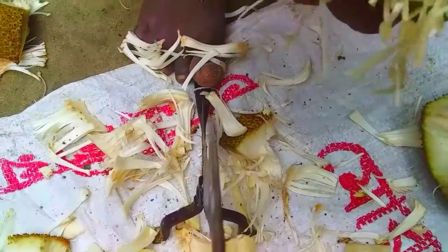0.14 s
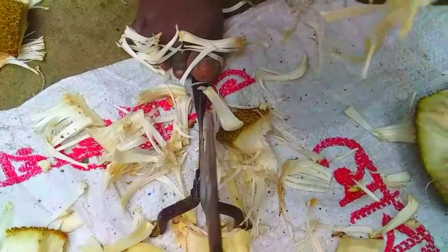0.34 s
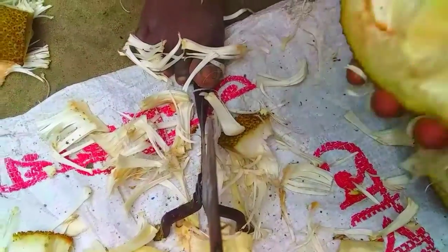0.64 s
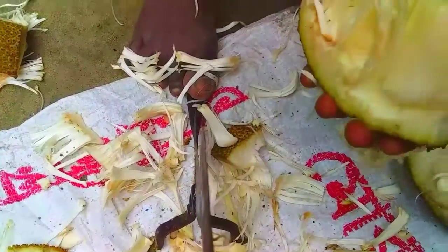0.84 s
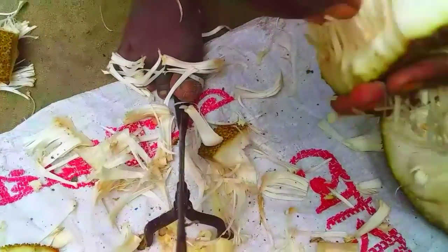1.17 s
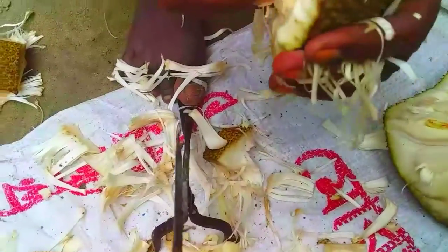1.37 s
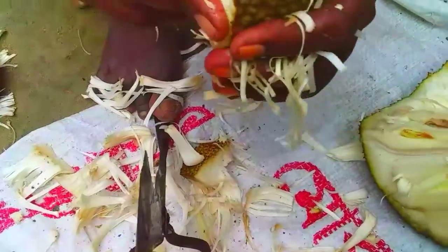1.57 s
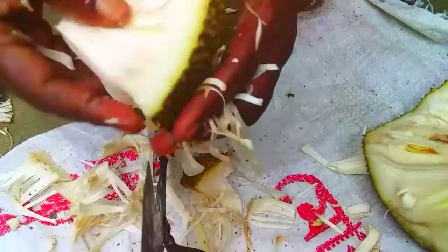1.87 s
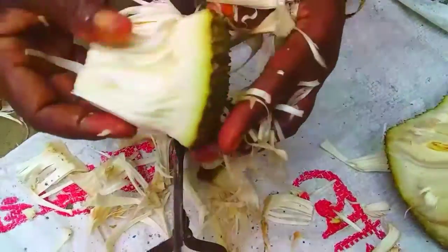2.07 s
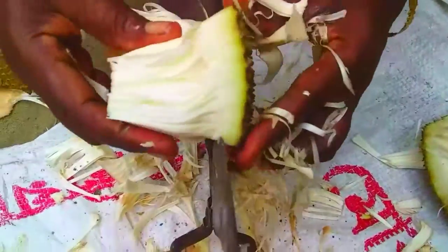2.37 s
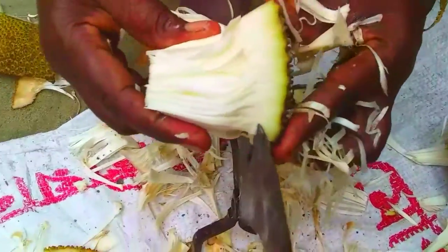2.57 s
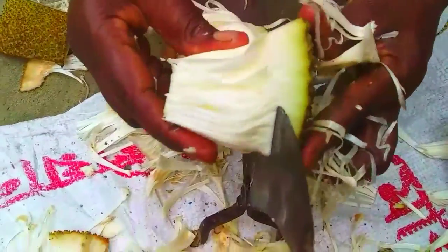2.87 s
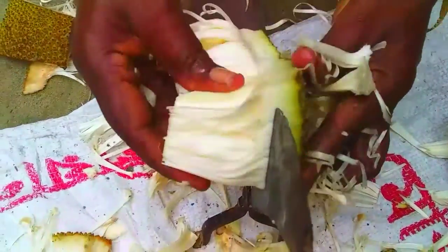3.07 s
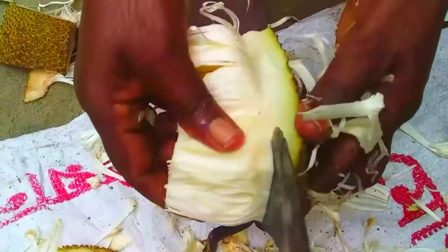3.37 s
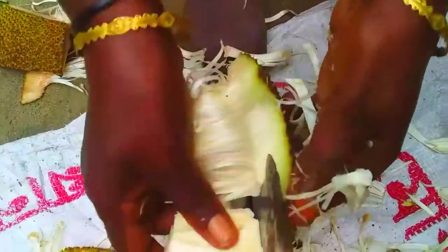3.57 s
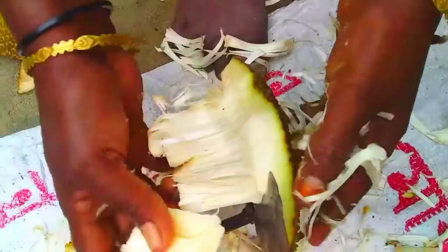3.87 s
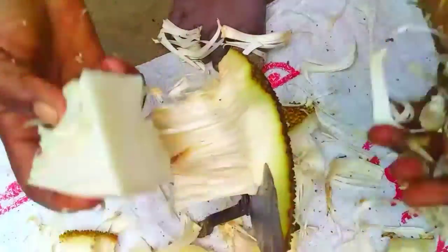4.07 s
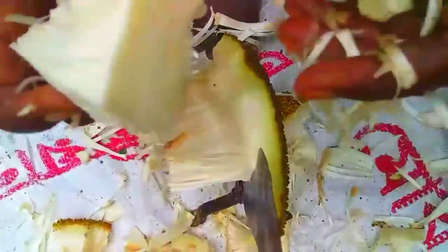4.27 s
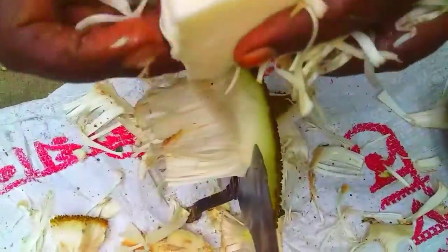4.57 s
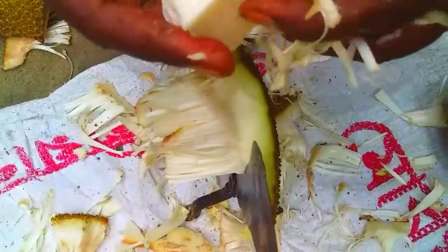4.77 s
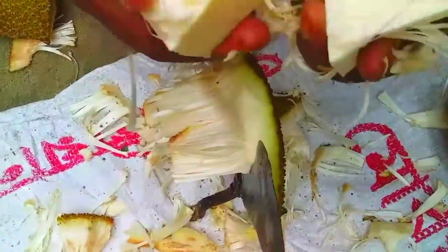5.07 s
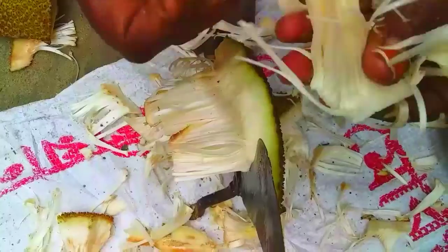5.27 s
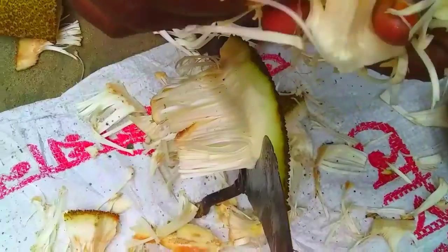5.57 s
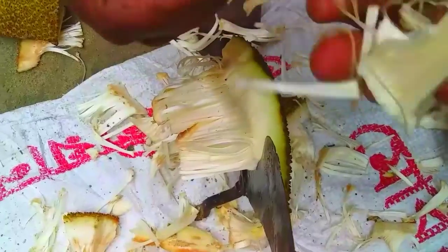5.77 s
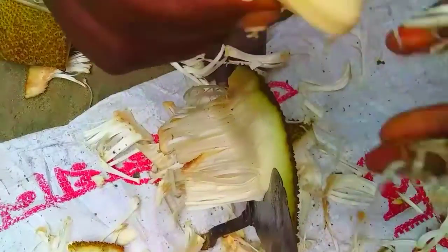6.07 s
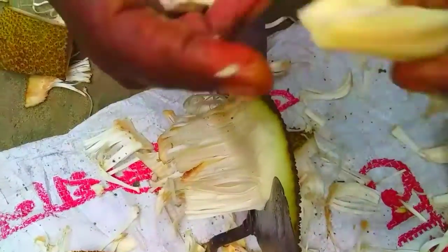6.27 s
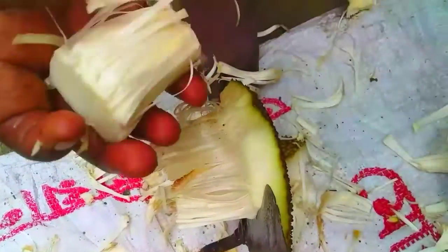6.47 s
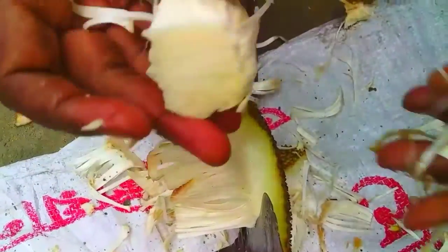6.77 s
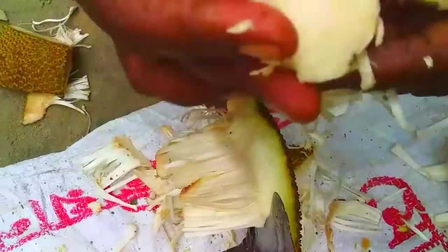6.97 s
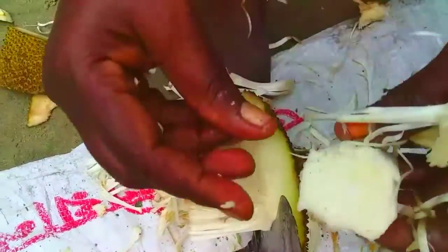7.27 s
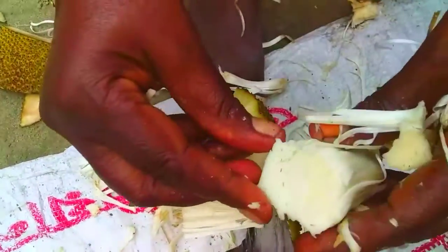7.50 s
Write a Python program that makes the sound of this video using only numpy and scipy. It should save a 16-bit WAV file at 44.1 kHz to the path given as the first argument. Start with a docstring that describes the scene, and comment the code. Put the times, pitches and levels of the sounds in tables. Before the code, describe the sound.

Wet fruit fibres crackle and snap on a blade, plastic sacking rustles, chicks peep steadily, a kid goat bleats, and fainter goats answer.

```python
"""A village yard: right under the microphone a green jackfruit is cut on an upright blade, noise grains for
the fibres, damped rings for the bumps; a bird swoops first, then chicks peep as gliding whistles between walls.
A young goat bleats once close by, harmonics through a throat; hands brush a plastic sack in sparse bright ticks.
Far goats answer, one rising and one trembling, and falling chips follow. Filtered noise gives a low rumble and
hiss throughout; a second low noise swells towards the end, as of a distant engine."""
import sys
import numpy as np
from scipy import signal
from scipy.fft import rfft, irfft, next_fast_len
from scipy.io import wavfile

SR = 44100
rng = np.random.default_rng(int(sys.argv[2]) if len(sys.argv) > 2 else 0)


def master(y):
    """Save y as 16-bit WAV."""
    cut = np.clip(np.atleast_2d(y).T, -1, 1)
    pcm = np.round(cut * 32767)  # scale
    wavfile.write(sys.argv[1], SR, pcm.astype(np.int16))


N = 336867
TIME = np.arange(N) / SR

# bright colour of breaking fibres and of the rubbed weave: frequency_hz, density_db (per Hz)
CRISP = [(500, -12), (1200, -21), (1800, -34), (3000, -8), (4200, 2), (5400, -3), (7000, 4.5), (8500, 3.5),
         (10500, -1), (12800, 4), (15500, -21.5)]


def from_db(db):
    """Decibels to amplitude gain."""
    return 10 ** (np.asarray(db) / 20)


def rms_one(x):
    """Scale to unit power."""
    return x / np.sqrt(np.mean(x ** 2) + 1e-20)


def in_time(rows, t=TIME):
    """Each column after the first, read along the first at the points t."""
    s, *columns = np.transpose(rows)
    return [np.interp(t, s, column) for column in columns]


def gain_at(spectrum, hz):
    """Gain of a spectrum, straight lines in dB over log frequency."""
    points, db = np.transpose(spectrum)
    return from_db(np.interp(np.log(hz + 1e-6), np.log(points), db))


def coloured(x, spectrum):
    """Causal (minimum-phase) filter with that spectrum and unit power gain."""
    size = 2 * next_fast_len(N // 2 + 4096)
    gain = rms_one(gain_at(spectrum, np.fft.rfftfreq(size, 1 / SR)))
    # folding the cepstrum forward in time gives the minimum phase
    cepstrum = irfft(np.log(gain))
    cepstrum[1:size // 2] *= 2
    cepstrum[size // 2 + 1:] = 0
    return irfft(rfft(x, size) * np.exp(rfft(cepstrum)))[:N]


def drift(rate, size):
    """Random values of spread 1, rate of them a second, joined by straight lines."""
    steps = np.arange(size) * rate / SR
    return np.interp(steps, np.arange(20000), rng.standard_normal(20000))


def add(out, s, sound):
    """Mix a sound in at time s."""
    start = round(s * SR)
    out[start:start + len(sound)] += sound[:max(N - start, 0)]


def yard(x, gap_s=0.0083, wall_s=0.032, wall=0.44, dull_hz=6500):
    """Scattered, dulled echoes die away, and one wall stands out among them."""
    t60_s = 0.49
    t = TIME[:SR]
    tail = rng.standard_normal(SR) * from_db(-60 * t / t60_s) * np.clip(t / gap_s - .5, 0, 1)
    tail = signal.sosfilt(signal.butter(1, min(dull_hz, SR / 3), fs=SR, output="sos"), tail)
    tail /= np.linalg.norm(tail)
    tail[int(wall_s * SR)] += wall
    return signal.fftconvolve(x, tail)[:N]


def grains(per_s, spread_db):
    """Random tiny fractures of uneven size; unit power."""
    sizes = from_db(spread_db * np.minimum(rng.exponential(1, N), 4))
    signed = sizes * rng.choice([-1, 1], N)
    return rms_one(signed * (rng.random(N) < per_s / SR))


def cutting(release_s=0.0065, snap_s=0.0014, flesh_db=-4):
    """Fibres break in swarms under each stroke and singly between; the moist flesh adds a dull knock."""
    # strokes that tear the fibres: start_s, length_s, level_db, dullness_db (dull part against crisp, before flesh_db)
    strokes = [(0.179, 0.048, -56, 2), (1.047, 0.02, -48.5, -0.5), (2.7, 0.11, -55, -1.5),
               (2.93, 0.072, -46, -4), (3.213, 0.065, -43, -4), (3.529, 0.055, -42.5, 3),
               (3.557, 0.075, -35, -4), (3.592, 0.0075, -35, 1), (4.739, 0.0045, -30, -8),
               (4.798, 0.026, -38, -11), (4.873, 0.032, -44.5, -2), (5.564, 0.063, -48, -12),
               (6.052, 0.041, -48.5, 4.5), (6.096, 0.16, -63.5, 13.5), (6.596, 0.026, -50.5, 2.5),
               (7.142, 0.046, -66, 16.5), (7.482, 0.13, -49, -3)]
    # loudest single fibres: start_s, level_db (noise before colouring), dullness_db (as above)
    snaps = [(0.1032, -44.5, 1), (0.1245, -40, 2), (0.2168, -35.5, 2), (0.392, -51, 11),
             (1.076, -40.5, 8.5), (3.5354, -37, 0), (3.5687, -32, 8.5), (3.5957, -32.5, 9.5),
             (3.6058, -23, -12), (3.8427, -49, 7), (4.4722, -37, 0.5), (4.667, -36.5, -20),
             (4.809, -29, -2), (4.8846, -34, -3), (4.93, -29.5, -5), (5.0211, -27.5, -15),
             (5.243, -44, 0.5), (5.27, -37.5, -14), (5.5883, -35, -22), (7.0061, -39, -29), (7.097, -47, 9)]
    # dull colour of the moist flesh: frequency_hz, density_db (per Hz)
    flesh = [(50, -12), (150, 11), (400, -2), (700, 1.5), (1000, 3.5), (1600, 10.5), (2300, 7.5),
             (4000, 4.5), (9000, -27)]

    crisp, dull = np.zeros((2, N))
    for s, length, level_db, dull_db in strokes:
        t = TIME[:int((2 * length + 8 * release_s) * SR)]
        onset = np.minimum(t / (0.18 * length), 1)
        release = np.exp(-np.maximum(t - 0.81 * length, 0) / (release_s + 0.11 * length))
        push = from_db(level_db) * onset * release
        add(crisp, s, push)
        add(dull, s, push * from_db(dull_db))
    # bundles of fibres give way unevenly
    catching = rms_one(from_db(2.4 * drift(220, N)))
    crisp = catching * crisp * grains(3700, 1.8)
    dull = catching * dull * grains(2000, 1.9)

    t = TIME[:SR // 50]
    for s, level_db, dull_db in snaps:
        bursts = from_db(level_db) * np.exp(-t / snap_s) * rng.standard_normal((2, len(t)))
        add(crisp, s, bursts[0])
        add(dull, s, bursts[1] * from_db(dull_db))
    return coloured(crisp, CRISP) + from_db(flesh_db) * coloured(dull, flesh)


def bumps():
    """Soft bumps of the fruit and the blade: heavily damped rings that build over one cycle."""
    # start_s, level_db (amplitude before the decay), pitch_hz, t60_s
    knocks = [(0.852, -26, 101, 0.032), (1.051, -38.5, 730, 0.027), (3.533, -21.5, 145, 0.02),
              (3.594, -26.5, 672, 0.024), (5.325, -48, 654, 0.034), (6.598, -58, 644, .04),
              (7.155, -44, 670, 0.02)]
    out, t = np.zeros(N), TIME[:SR // 4]
    for s, level_db, hz, t60 in knocks:
        envelope = from_db(level_db - 60 * t / t60) * np.minimum(t * hz, 1)
        add(out, s, envelope * np.sin(2 * np.pi * hz * t))
    return out


def sack(per_s=170, spread_db=2.5, rub_db=-1):
    """Each brush rubs the weave and sets off sparse bright ticks of plastic strands; a few tick on at rest."""
    # the hands brush the woven sack: start_s, length_s, level_db
    rustles = [(2.43, 0.52, -69), (3.673, 0.19, -60.5), (4.013, 0.19, -60), (4.633, 0.31, -56),
               (5.2, 0.3, -64.5), (5.804, 0.14, -54.5), (6.633, 0.22, -60)]
    # colour of the plastic strands: frequency_hz, density_db (per Hz)
    plastic = [(1000, -10.5), (3000, -7), (5500, -13), (7500, 1), (10000, -5), (12500, -3), (15500, 2.5)]
    attack_s, release_s, rest_db = 0.025, 0.027, -64

    brush = np.zeros(N)
    for s, length, level_db in rustles:
        attack = np.clip((TIME - s) / attack_s, 0, 1)
        release = np.exp(-np.maximum(TIME - s - length, 0) / release_s)
        brush += from_db(level_db) * attack * release
    ticks = (from_db(rest_db) + brush) * coloured(grains(per_s, spread_db), plastic)
    rub = from_db(rub_db) * brush * coloured(grains(2500, 1.1), CRISP)
    return ticks + rub


def goat(curve, throat, jitter=.025, flutter_db=2.0, rasp=.7, pivot_hz=1600):
    """Harmonics of the vocal folds through the throat; roughness shakes the period and the pulse strength."""
    t = np.arange(curve[0][0], curve[-1][0], 1 / SR)
    pitch, level_db, rough, tilt_db = in_time(curve, t)
    pitch = pitch * (1 + jitter * rough * drift(350, len(t)) + 0.00187 * drift(35.1, len(t)))
    phase = 2 * np.pi * np.cumsum(pitch) / SR
    voice, power = 0, 0
    for k in range(1, 22):
        # the mouth tilts the upper harmonics, so many dB per octave above the pivot
        octaves = np.log2(np.maximum(k * pitch / pivot_hz, 1))
        gain = gain_at(throat, k * pitch) * from_db(tilt_db * octaves)
        # up to the fifth, the higher the harmonic the more its strength wavers
        flutter = from_db(flutter_db * min(k / 5, 1) * drift(32.0, len(t)))
        shake = flutter * (1 + rasp * rough * drift(500, len(t)))
        voice = voice + gain * shake * np.sin(k * phase + rng.uniform(0, 2 * np.pi))
        power = power + gain ** 2 / 2
    out = np.zeros(N)
    add(out, t[0], from_db(level_db) * voice / np.sqrt(power))
    return out


def near_cry(gain_db=0.5, neutral_treble_db=-6, tilt_share=0.9, closing_db_per_octave=-19):
    """The kid's course: as the pitch collapses the voice roughens and the mouth closes."""
    # near bleat: start_s, pitch_hz, level_db (before gain_db), treble_db (against the level, as the mouth opens)
    bleat = [(1.14, 566, -60, -15), (1.154, 567, -63, 2), (1.176, 580.5, -55, -16), (1.248, 562.8, -46, -9),
             (1.41, 562.4, -40.5, -7), (1.418, 552.4, -45, -4.5), (1.468, 560.7, -42.5, -13.5),
             (1.484, 558, -48, -6.5), (1.524, 560, -40.5, -12.5), (1.562, 553.5, -41.5, -7.5),
             (1.604, 555, -37, -13.5), (1.638, 546.3, -46.5, -5), (1.68, 531.6, -44, 0),
             (1.708, 498.5, -37, -28), (1.75, 434.3, -44.5, -8), (1.775, 411, -47, 9.5)]
    # clean while held, rough (0-1) as the pitch collapses
    held_rough, collapse_below_hz, rough_per_octave, max_rough = 0.1, 556, 5.2, 1
    # it cracks once in mid-cry
    crack_s, crack_width_s, crack_rough = 1.42, 0.038, 0.22

    t = np.arange(bleat[0][0], bleat[-1][0], 1 / 1000)
    pitch, level_db, treble_db = in_time(bleat, t)
    fallen = np.maximum(np.log2(collapse_below_hz / pitch), 0)   # octaves
    crack = crack_rough * np.exp(-((t - crack_s) / crack_width_s) ** 2)
    rough = np.minimum(held_rough + crack + rough_per_octave * fallen, max_rough)
    tilt_db = tilt_share * (treble_db - neutral_treble_db) + closing_db_per_octave * fallen
    # rows of time, pitch, level, roughness, tilt
    return np.transpose([t, pitch, level_db + gain_db, rough, tilt_db])


def far_cry(start_s, length_s, attack_s, release_s, level_db, swell_db, top_hz, top_s, arch_hz, rough, tremble):
    """The same rows for a far goat: swelling hold under an arch of pitch; trembling swings pitch and level."""
    fade_db = 9   # depth of the attack and the release
    period_s, first_crest_s, swing_hz, swing_db = .116, .055, 34.2, 6   # swings at a tremble of 1
    t = np.arange(0, length_s, 1 / 1000)
    opening = np.minimum(np.minimum(t / attack_s, (t[-1] - t) / release_s), 1)
    throb = tremble * np.cos(2 * np.pi * (t - first_crest_s) / period_s)
    pitch = top_hz - arch_hz * (2 * (t - top_s) / length_s) ** 2 + swing_hz * throb
    level = level_db + swell_db * t / length_s - fade_db * (1 - opening) + swing_db * throb
    return np.transpose([start_s + t, pitch, level, np.full_like(t, rough), np.zeros_like(t)])


def goats(hiss_db=-9, hiss_release_s=0.14):
    """The near cry turns to a rasping hiss where it is rough; the far animals carry much more echo."""
    # the kid's throat with open mouth: frequency_hz, gain_db
    kid_throat = [(450, -29), (560, -33), (1120, -8.5), (1400, 12), (1690, 3), (2250, -10), (2810, 1),
                  (3370, -6), (4500, -4), (5600, -7.5), (6200, -15), (7900, -15), (9500, -31), (12000, -44)]
    # throats of the far goats, the rising answer and the trembling one: frequency_hz, gain_db
    answer_throat = [(600, -20), (1200, -12), (1800, -2), (2400, -8.5), (3000, -10), (3600, -5.5),
                     (4800, -2), (6000, -14), (9000, -21)]
    quaver_throat = [(470, -0.5), (950, 9.5), (1450, -7), (1900, -5), (2400, -6), (2900, 7), (3400, 3),
                     (4300, -2), (8000, -11)]
    # turbulence in the kid's throat: frequency_hz, density_db (per Hz)
    turbulence = [(400, -18), (1400, -5), (2100, -1), (2700, 2), (3800, -9), (4700, 4.5), (6000, -1),
                  (8000, -3), (12000, -12)]
    # far bleats, one rising and one trembling: start_s, length_s, attack_s, release_s, level_db, swell_db,
    # top_hz, top_s (after the start), arch_hz (fall half a length from the top), roughness (0-1), tremble (share)
    far_cries = [(4.351, .47, 0.071, 0.15, -56.5, -3, 604, .31, 45.75, 0.42, 0),
                 (5.603, .55, 0.022, 0.04, -71.5, 11.5, 446.7, .27, 39.84, 0.51, 0.98)]

    cry = near_cry()
    _, level_db, rough, _ = in_time(cry)
    airflow = (TIME > cry[0, 0]) * np.exp(-np.maximum(TIME - cry[-1, 0], 0) / hiss_release_s)
    hiss_gain = from_db(level_db + hiss_db) * rough * airflow
    hiss = hiss_gain * coloured(rng.standard_normal(N), turbulence)
    near = goat(cry, kid_throat, jitter=0.02, flutter_db=2.5, rasp=0.28) + hiss
    rising, trembling = [far_cry(*row) for row in far_cries]
    answer = goat(rising, answer_throat, jitter=0.0443, flutter_db=5.0, rasp=1.0)
    quaver = goat(trembling, quaver_throat, jitter=0.101, flutter_db=4.5, rasp=1.0)
    to_walls = from_db(-11.5) * near + from_db(-6.0) * answer + from_db(-6.5) * quaver
    return near + answer + quaver + yard(to_walls)


def bird(notes, shape, waver=.006):
    """Pure gliding whistles of one shape, from rows (s, dB, length s, top Hz, echo dB): direct and to the walls."""
    direct, to_walls = np.zeros((2, N))
    for s, level_db, length, top_hz, echo_db in notes:
        along = np.linspace(0, 1, int(length * SR))
        share, shape_db = in_time(shape, along)
        pitch = top_hz * share * (1 + waver * drift(394.5, len(along)))
        envelope = from_db(level_db + shape_db) * signal.windows.tukey(len(along), .1)
        note = envelope * np.sqrt(2) * np.sin(2 * np.pi * np.cumsum(pitch) / SR)
        add(direct, s, note)
        add(to_walls, s, from_db(echo_db) * note)
    return np.array([direct, to_walls])


def ground(x, lag_s=0.016, bounce=0.35, post_s=0.02, post=0.15):
    """Two early reflections beat with every gliding tone."""
    first = bounce * np.interp(TIME - lag_s, TIME, x)
    second = post * np.interp(TIME - post_s, TIME, x)
    return x + first + second


def birds():
    """Whistled notes share the yard; a dip leads into each peep and a tick opens each chip."""
    # shapes of the notes: along (share of the length), pitch (share of the top pitch), level_db
    arch = [(0, .59, -31), (.12, .745, -16), (.26, .925, -5), (.42, 1, 0), (.6, .97, -1), (.8, .88, -8),
            (1, .76, -19)]
    chip_shape = [(0, 1, -9), (0.106, .77, -9), (0.251, .62, -3), (.5, .525, -4), (.78, .47, -19.5),
                  (1, 0.4056, -15.5)]
    swoop_shape = [(0, 1.03, -15), (.1, .96, -4), (.24, .87, 1), (.32, .67, 1), (.43, .51, 1),
                   (.56, .445, -3), (1, .4, -16)]
    dip_shape = [(0, 1, -38), (.2, .78, 12.5), (.45, .63, 7.5), (0.699, .6, 3.5), (1, 0.646, -32)]
    slide_shape = [(0, 0.96, 3), (.2, .9, 2.5), (.5, .76, 0.5), (.75, .64, -5), (1, 0.45, -7)]
    # one loud swooping note, and the soft dip that trails it: start_s, level_db, length_s, top_hz, echo_db
    swoops = [(.1335, -38, .061, 6290, -4)]
    trails = [(.232, -65, 0.05, 2950, -6.5)]
    # chick peeps: start_s, level_db (direct sound), length_s, top_hz
    peep_rows = [(0.407, -38.5, 0.066, 3318), (0.74, -37, 0.068, 3366), (1.084, -38, 0.08, 3376),
                 (2.554, -45.5, 0.053, 3263), (3.097, -43.5, 0.075, 3424), (3.416, -38.5, 0.079, 3423),
                 (3.773, -42.5, 0.072, 3337), (4.112, -37.5, 0.068, 3370), (4.448, -38, 0.099, 3347),
                 (4.795, -35.5, 0.077, 3342)]
    # short slides, some nearly all echo: start_s, level_db, top_hz, echo_db
    slide_rows = [(0.983, -78, 6670, 12), (1.841, -64.5, 4780, 9.5), (1.944, -73.5, 4330, 14),
                  (2.17, -70.5, 3906, 11), (2.203, -65.5, 4670, 9), (3.316, -76, 6650, 7),
                  (3.39, -71, 4920, 11), (3.784, -77.5, 4900, 25.5), (4.019, -55, 4410, -6.5),
                  (4.135, -72.5, 5450, 14.5), (5.221, -58, 4230, -8), (5.39, -70.5, 3500, 7.5),
                  (5.47, -71, 3400, 8.5)]
    # faint low hoots far off: start_s, level_db
    hoot_rows = [(1.808, -62), (1.929, -67.5), (2.024, -66)]
    # falling chips: start_s, level_db, length_s
    chip_rows = [(6.02, -44.5, 0.035), (6.325, -36, 0.03), (6.619, -38.5, 0.031), (7.09, -39.5, .035),
                 (7.394, -37.5, 0.029)]
    # the walls get every peep at the same level, however loud it is directly
    peep_echo_level_db = -46
    dip_lead_s, dip_s, dip_hz, dip_db, dip_echo_db = .031, 0.0301, 3220, -35, 4   # dip_db counts from the peep
    chip_hz, chip_echo_db = 4660, -6
    tick_lead_s, tick_s, tick_hz, tick_db = 0.0086, 0.0107, 3230, -11   # tick_db counts from the chip
    slide_s = 0.038
    hoot_s, hoot_hz, hoot_echo_db = 0.06, 658, -6

    peeps = [(s, db, length, hz, peep_echo_level_db - db) for s, db, length, hz in peep_rows]
    dips = [(s - dip_lead_s, db + dip_db, dip_s, dip_hz, dip_echo_db) for s, db, *_ in peep_rows]
    chips = [(s, db, length, chip_hz, chip_echo_db) for s, db, length in chip_rows]
    ticks = [(s - tick_lead_s, db + tick_db, tick_s, tick_hz, chip_echo_db) for s, db, _ in chip_rows]
    slides = [(s, db, slide_s, hz, echo_db) for s, db, hz, echo_db in slide_rows]
    hoots = [(s, db, hoot_s, hoot_hz, hoot_echo_db) for s, db in hoot_rows]
    direct, to_walls = (bird(peeps, arch, waver=0.0086)
                        + bird(dips + list(trails), dip_shape, waver=0.049)
                        + bird(chips, chip_shape, waver=0.037)
                        + bird(ticks, arch, waver=0.025)
                        + bird(swoops, swoop_shape, waver=0.036)
                        + bird(slides, slide_shape, waver=0.0345))
    far_direct, far_to_walls = bird(hoots, arch, waver=0.047)
    return ground(direct) + far_direct + yard(to_walls + far_to_walls)


def background():
    """Village rumble, a soft hiss, and the distant engine: coloured noises of moving level."""
    # colours: frequency_hz, density_db (per Hz)
    rumble_colour = [(20, -54), (40, -18), (58, -13.5), (78, 4), (100, -6), (130, -4), (200, -13.5),
                     (300, -17.5), (500, -33), (900, -41), (2000, -45.5), (8000, -70)]
    air_colour = [(300, -4.5), (1000, -6), (1800, -4), (3000, 4), (4200, 3.5), (5600, 1), (7500, 4.5),
                  (8800, 2), (11000, -0.5), (14200, -7), (15000, 9.5)]
    engine_colour = [(50, -12), (75, 2.5), (130, 2.5), (175, -6), (210, 9.5), (260, -3.5), (390, -1.5),
                     (520, -12.5), (900, -27.5), (2000, -37), (6000, -22)]
    # course of the high hiss: time_s, level_db (before a lift of 9 dB)
    air_course = [(0.0, -59), (0.85, -71), (1.62, -60), (1.96, -65), (2.53, -69), (2.79, -65.5),
                  (3.96, -67), (4.81, -56.5), (5.21, -63), (7.64, -62.5)]
    # the engine comes up, then holds
    full_s, rise_db_per_s, engine_db = 6.21, 18.5, -57

    sway = from_db(drift(10, N))   # the rumble sways by about a decibel
    rumble = from_db(-56.0) * sway * coloured(rng.standard_normal(N), rumble_colour)
    air = from_db(in_time(air_course)[0] + 9.0) * coloured(rng.standard_normal(N), air_colour)
    engine_gain = from_db(engine_db - rise_db_per_s * np.maximum(full_s - TIME, 0))
    engine = engine_gain * coloured(rng.standard_normal(N), engine_colour)
    return rumble + air + engine


def scene():
    """The cutting is right under the microphone, so nearly dry."""
    hands = cutting() + sack() + bumps()
    hands_echo = from_db(-22.5) * yard(hands)
    return (goats() + birds() + hands + hands_echo + background())[None]


def record(dry, step_hz=8800, top_db=-14, low_hz=42):
    """The microphone loses the deep bass and steps down in the high treble; the top is cut."""
    cutoff_hz = 15550
    dry = signal.sosfilt(signal.butter(2, low_hz, "high", fs=SR, output="sos"), dry)
    below = signal.sosfiltfilt(signal.butter(24, step_hz, fs=SR, output="sos"), dry)
    shelved = below + from_db(top_db) * (dry - below)
    return signal.sosfilt(signal.ellip(12, .1, 80, cutoff_hz, fs=SR, output="sos"), shelved)


dry = scene()
out = record(dry)
master(out)
```